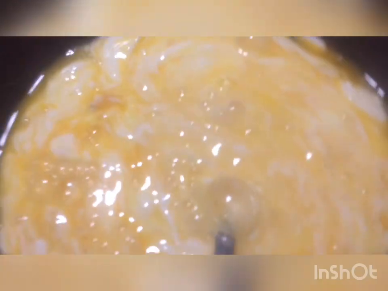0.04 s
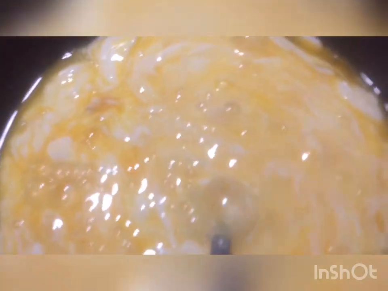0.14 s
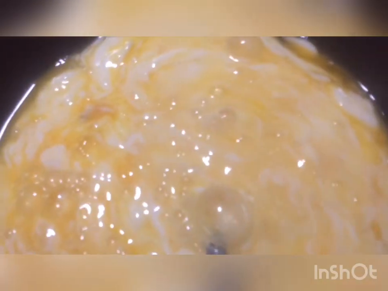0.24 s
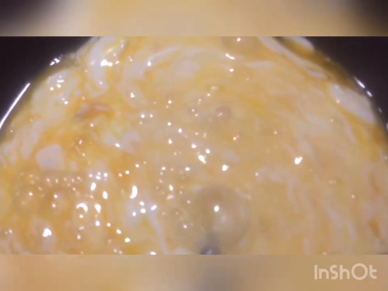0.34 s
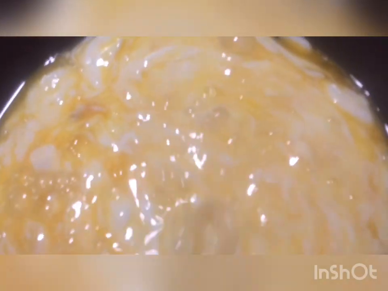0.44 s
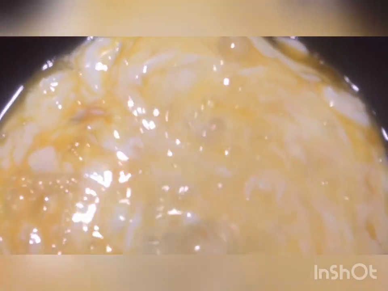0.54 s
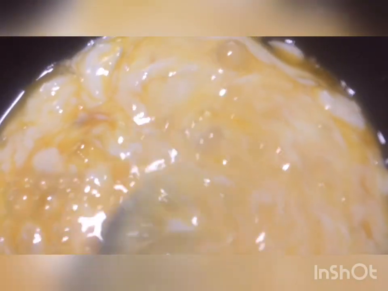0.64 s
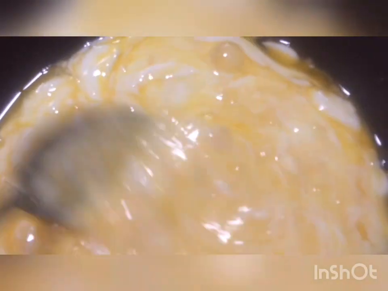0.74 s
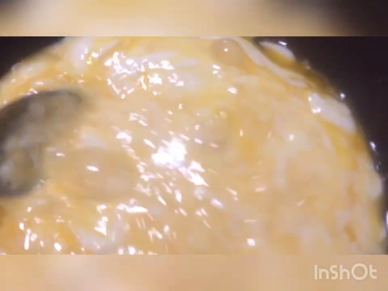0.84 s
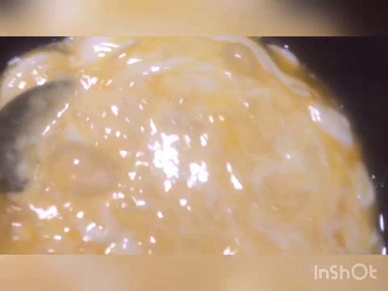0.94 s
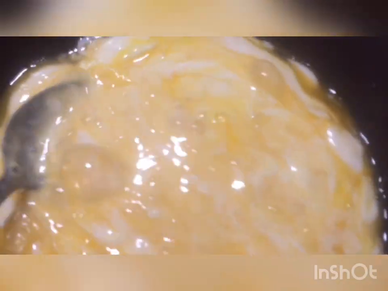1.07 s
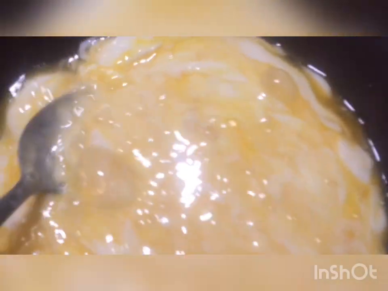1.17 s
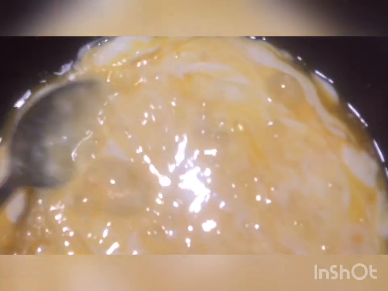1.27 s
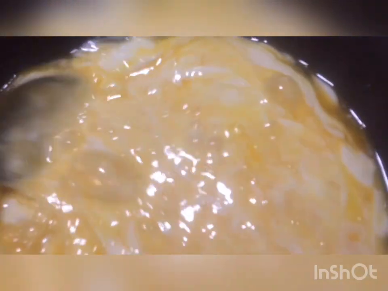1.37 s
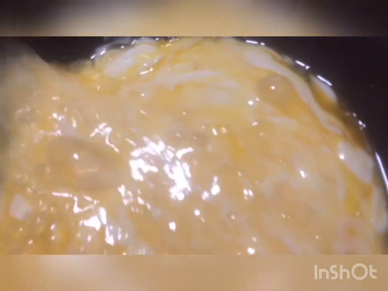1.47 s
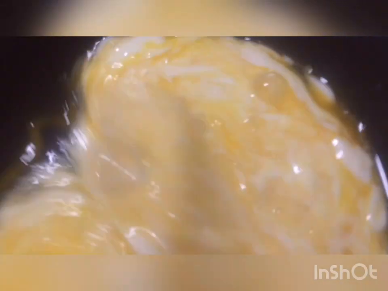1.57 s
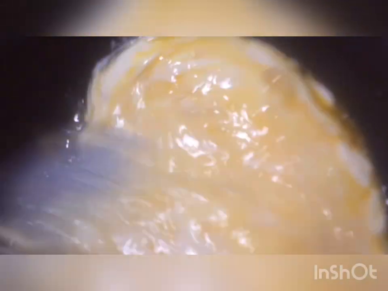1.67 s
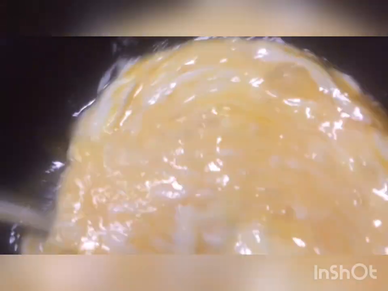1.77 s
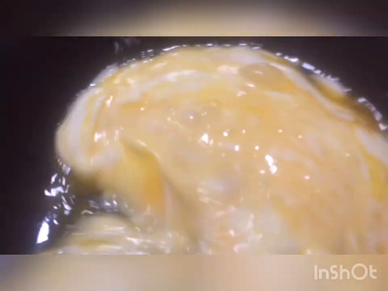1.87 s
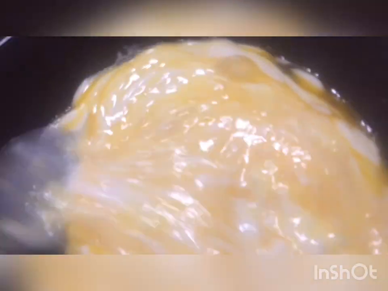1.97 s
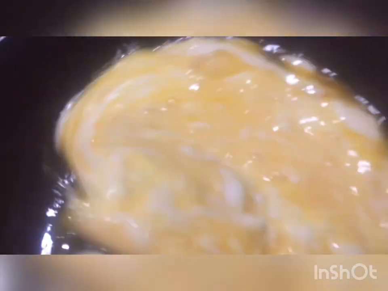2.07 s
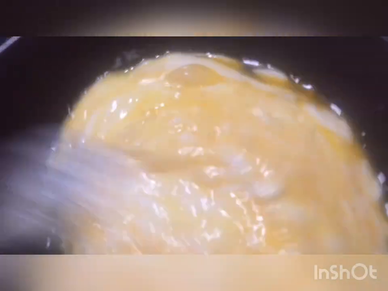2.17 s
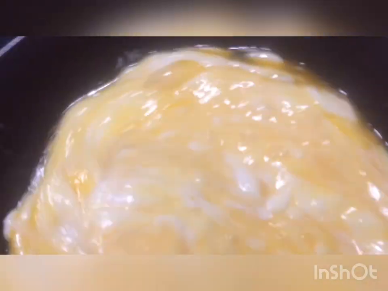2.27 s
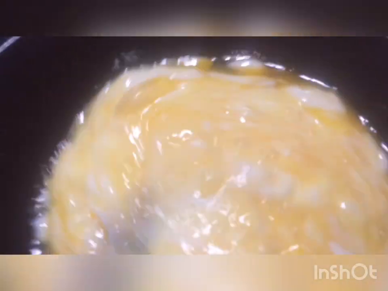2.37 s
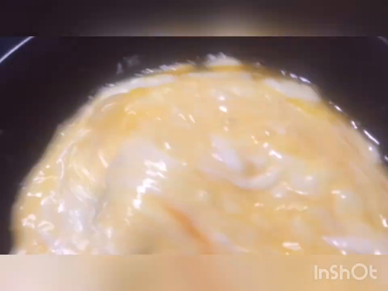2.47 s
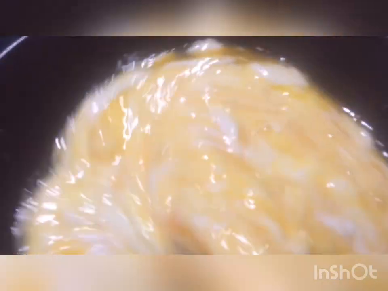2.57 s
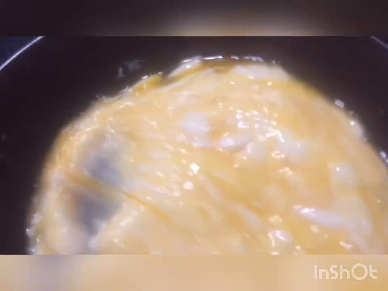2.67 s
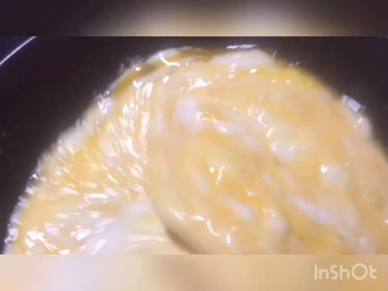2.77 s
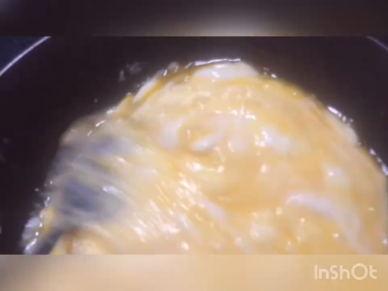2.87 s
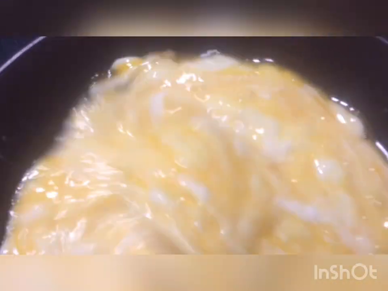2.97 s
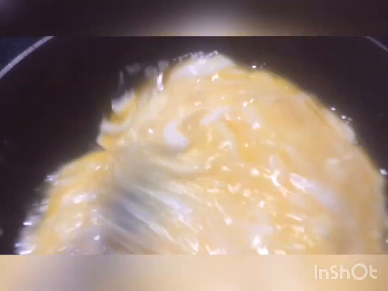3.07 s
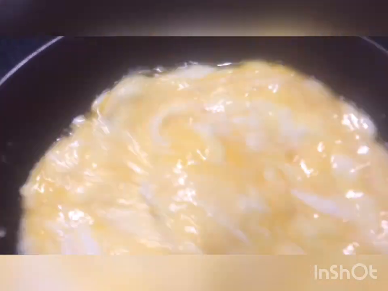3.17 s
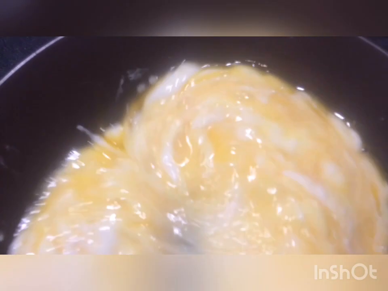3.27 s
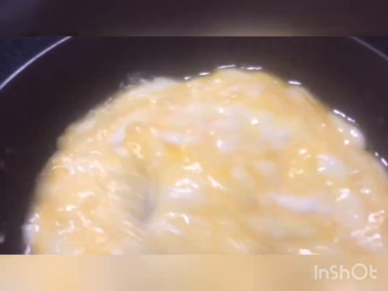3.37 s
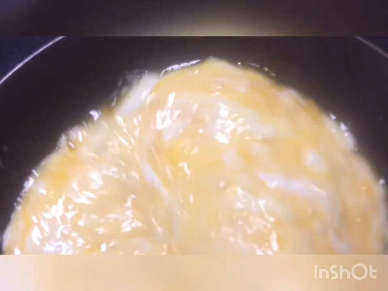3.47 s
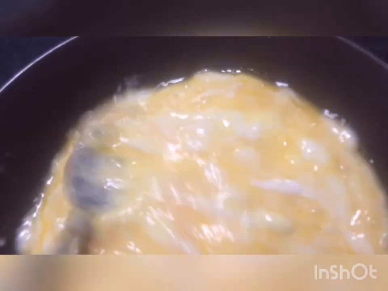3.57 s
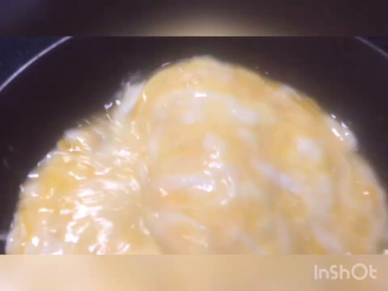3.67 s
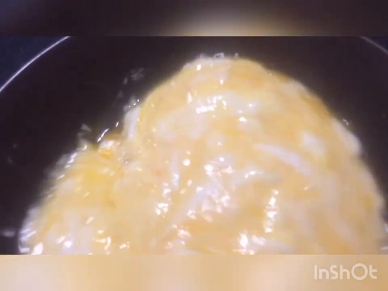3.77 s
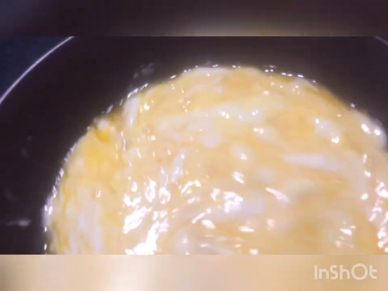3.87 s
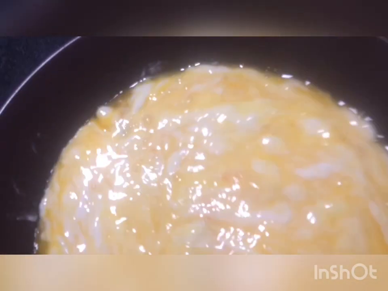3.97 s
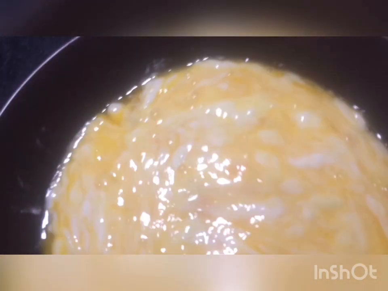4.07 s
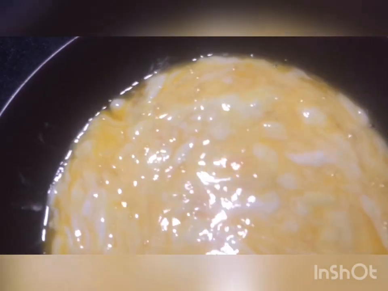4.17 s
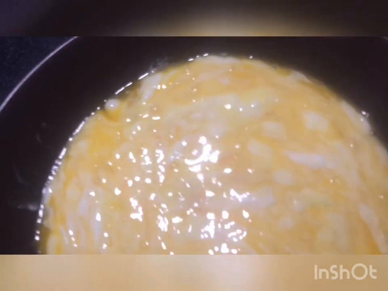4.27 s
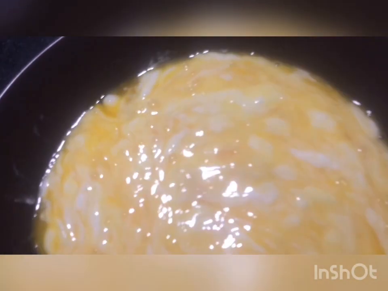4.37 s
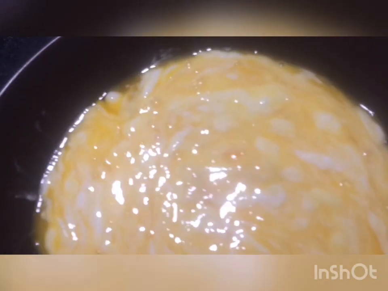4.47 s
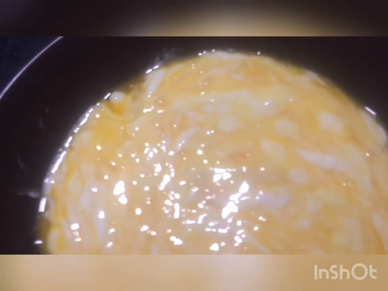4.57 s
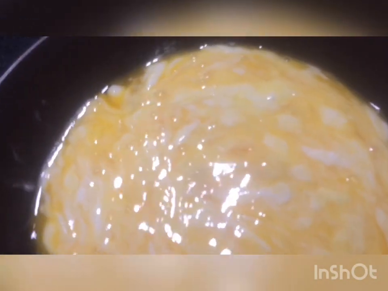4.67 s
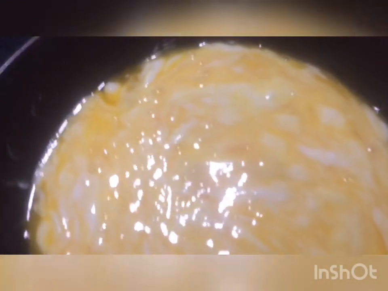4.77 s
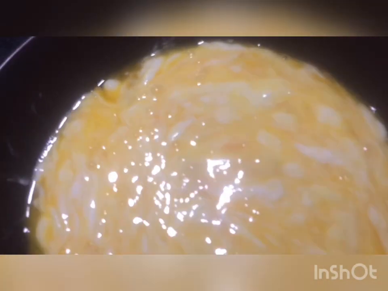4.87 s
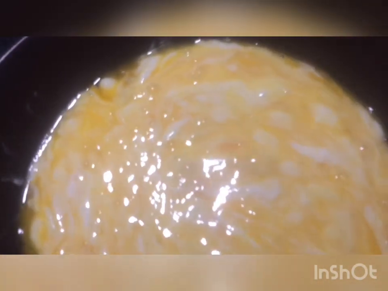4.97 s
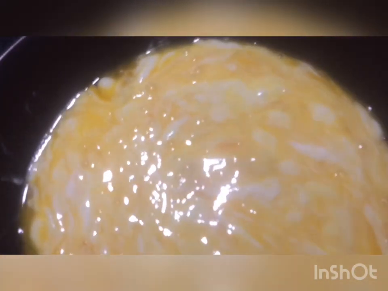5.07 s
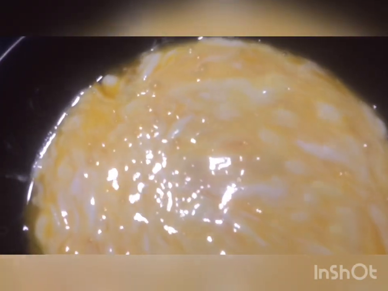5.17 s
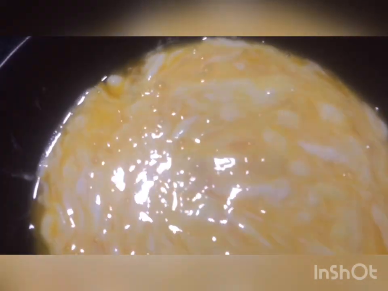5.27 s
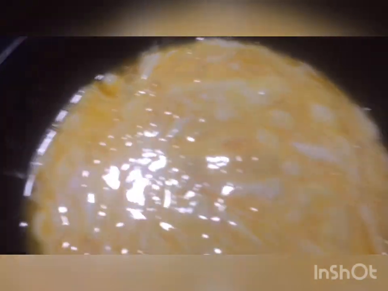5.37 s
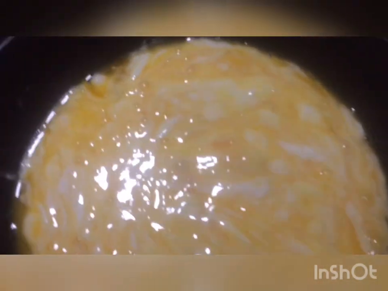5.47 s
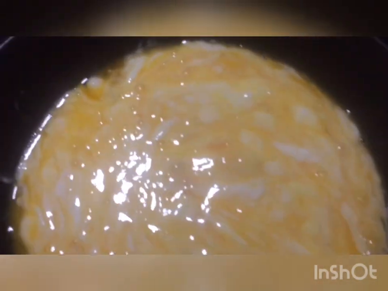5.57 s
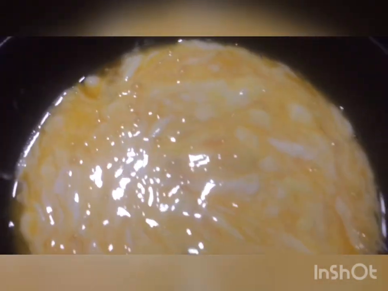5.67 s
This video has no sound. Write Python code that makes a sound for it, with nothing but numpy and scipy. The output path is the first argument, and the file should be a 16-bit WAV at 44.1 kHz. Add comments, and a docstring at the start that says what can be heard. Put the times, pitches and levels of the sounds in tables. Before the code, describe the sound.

In a small kitchen, close to the microphone, a fork makes a few slow, grinding drags across a coated metal pan, one with a brief squeak. It then beats eggs about four times a second, each stroke knocking and scraping while the egg plops and smacks. The beating eases off, the fork drops against the rim with a rattling ring, and a dull bump follows. A distant appliance whirrs faintly throughout.

```python
"""A fork beats eggs in a coated metal pan, close to the microphone, in a small kitchen.
After a few slow, grinding drags it whisks about four times a second: each stroke knocks on the pan,
skids over the bottom in stick-slip and flings egg, whose air pockets plop and whose films smack.
At the end the fork drops against the rim and rings. The near walls echo briefly, and a distant
appliance whirrs faintly behind it all."""
import sys
import numpy as np
from scipy import signal
from scipy.fft import rfft, irfft
from scipy.io import wavfile
from scipy.ndimage import uniform_filter1d, map_coordinates

SR = 44100
rng = np.random.default_rng(int(sys.argv[2]) if len(sys.argv) > 2 else 0)


def digitize_waveform(pressure):
    """Quantize a signal to 16-bit integers and store it at the path in sys.argv[1].

    Rows of a 2-D input are taken as channels; values are limited to [-1, 1].
    """
    field = np.atleast_2d(pressure).T
    bounded = np.clip(field, -1, 1)
    quanta = np.round(bounded * 32767).astype(np.int16)
    wavfile.write(sys.argv[1], SR, quanta)


N = 253134
AGE = np.arange(SR // 2) / SR   # time since an event began

# Levels are relative: the functions add their own gains.
# steady rush of the kitchen: f/Hz, level/dB
ROOM_SPECTRUM = [(15, -41), (25, -16), (161, -1.5), (185, -19), (354, -5), (416, -15.5), (624, -16.5),
                 (1040, -16), (1480, -10), (2000, -29.5), (2350, -23), (2910, -29), (4250, -20),
                 (10100, -30.5), (16000, -48.5)]
# its course: t/s, level/dB
ROOM_LEVEL = [(0, -60), (4.4, -59.5), (5.7, -61.5)]
# resonances of the distant appliance: f/Hz, width/Hz, level/dB
APPLIANCE_BANDS = [(167, 18, 0), (357.2, 30.16, -8), (643, 5.6, 0), (1322.5, 70.7, -7), (1530, 120, -5.5),
                   (1670, 35, -17)]
# its course: t/s, level/dB
APPLIANCE_LEVEL = [(0, -62), (4.399, -61.5), (4.8, -61), (5.699, -58)]
# reverberation of the kitchen: f/Hz, t60/s
KITCHEN_DECAY = [(150, 0.62), (500, .36), (1400, 0.18), (4000, 0.36), (9000, 0.25), (16000, 0.23)]

# air pockets opening in the egg: t/s, level/dB, f/Hz, level of the film bursting over them/dB
AIR_POCKETS = [(1.764, -24, 1340, -46.5), (1.7969, -18, 1220, -15.5), (2.0193, -14.5, 725, -17),
               (2.2794, -20.5, 1045, -32.5), (2.2797, -15.5, 2670, -22.5), (2.5133, -23.5, 602, -38),
               (2.578, -35, 1030, -56), (2.6972, -27, 770, -20), (2.9122, -31, 698, -22),
               (2.9374, -21, 1323, -27), (3.0197, -12.5, 1310, -23), (3.1537, -13, 1095, -15.5),
               (3.171, -21, 2980, -42), (3.187, -14, 1440, -26), (3.3467, -20, 628, -26),
               (3.421, -19, 3810, -42), (3.571, -16, 992, -16.5), (3.6391, -11, 1177, -53)]
# thick films of egg snapping off the fork: t/s, level/dB, centre f/Hz
FILM_SNAPS = [(1.814, -15, 6730), (2.0022, -23.5, 4250), (2.0776, -12.5, 6533), (2.2547, -17.5, 5130),
              (2.2805, -20, 7300), (2.4795, -16.5, 5240), (2.528, -15.5, 6334), (2.6957, -7.5, 4900),
              (2.913, -12, 5160), (2.964, -19.5, 4230), (3.2292, -25, 3300), (3.361, -16.5, 4260)]

# modes of the metal: f/Hz, level/dB, t60/s
PAN_MODES = [(175.6, -34.5, .2), (316.5, -37, 0.16), (450, -29.5, 0.046), (660, -28, 0.085),
             (830, -33, 0.29), (1274, -5.5, 0.092), (1325, -8, 0.17), (1270, -17, 0.27),
             (1406, -0.5, 0.035), (2100, 8.5, 0.015), (1957, -13.5, 0.046), (2467, -6.5, 0.06),
             (3230, -15, 0.18), (5650, -31, 0.065)]   # pan damped by egg
WALL_MODES = [(1304, -10.5, .4), (3056, -1, 0.1), (3430, -2.5, 0.13), (5020, -16, 0.13), (5152, -7, .08),
              (5915, 0, 0.11)]   # its dry wall above the egg
FORK_MODES = [(178, -26.5, 0.21), (310, -24.5, .2), (454, -26, .17), (724, -23, 0.32), (991, -15.5, .17),
              (1272, -41, 0.55), (2030, -14, 0.22), (2910, -16, 0.22), (3980, 0, 0.19), (4065, -27.5, 0.43),
              (5157, -23.5, .24), (6440, -24, .13), (6260, -29.5, 0.38), (6600, -27, .11), (8032, -21, .16),
              (10500, -22, 0.095)]   # loosely held fork
# spectra of fork meeting pan: f/Hz, level/dB
THUD_SPECTRUM = [(20, -58), (70, -36.5), (140, 0.5), (260, -11.5), (420, 0.5), (540, -2.5), (700, -2.5),
                 (1000, -6.5), (1700, -8), (3500, -38)]   # shoved pan
CRACK_SPECTRUM = [(50, -50.5), (600, -18.5), (1300, -56), (2500, 6), (4000, 8), (6000, 5), (7500, 2),
                  (10000, 0), (12500, -14.5), (16000, -24)]   # whisking hit
RIM_SPECTRUM = [(50, -49.5), (600, -18.5), (1500, -6), (2500, -6.5), (4000, 3), (5400, -12.5), (6700, 2.5),
                (7800, -6), (9000, -20), (11000, -17.5), (16000, -33)]   # hit on the rim
SKID_SPECTRUM = [(20, -36), (100, -9), (260, -30), (400, -7.5), (540, -46.5), (700, -10), (1100, -13.5),
                 (1300, -3), (1600, 0.5), (2400, -0.5), (7000, 9.5), (10500, 0), (13000, -17), (16000, -35)]   # fast slide
DRAG_SPECTRUM = [(20, -52), (100, -44), (400, -9), (560, -17.5), (850, -13), (1200, -1.5), (1750, 7),
                 (2300, 0.5), (3200, 1.5), (4400, -9), (6300, -2.5), (9000, -14.5), (12000, -29.5),
                 (16000, -39.5)]   # slow slide
# resonances of dragged tines: f/Hz, width/Hz, level/dB
GRIND_BANDS = [(1200, 120, -1.5), (1470, 120, 0), (1920, 89, -3), (2510, 110, -2), (3120, 100, -10.5),
               (5970, 66, -14)]   # grinding over the bottom
SQUEAK_BANDS = [(618, 59, -12), (890, 60, -7.5), (1155, 56, -0.5), (1673, 54, -6), (2124, 150, -16),
                (2787, 46, -1.5), (3330, 17, 5), (3940, 550, -7), (5310, 45, 3), (6530, 39, -4),
                (7450, 79, -7), (9800, 230, -15.5)]   # squeaking on the coating

# dull bumps on the pan: t/s, level/dB
SOFT_BUMPS = [(.402, -53.5), (5.139, -54), (5.7325, -18.5)]
# a tine sticks and squeals: t/s, level/dB, f/Hz, length/s
TINE_SQUEALS = [(0.444, -23, 1750, 0.04), (0.667, -35, 1450, 0.023)]
# slow drags of the fork, the last row the fork sliding on as the final skid fades: start/s, end/s, level/dB,
# treble/dB, squeak share/0-1
SLOW_DRAGS = [(0.436, 0.556, -26, 11, 0.79), (.62, .7, -40.5, -28, 0.04), (0.956, 1.171, -33.5, -21, 0),
              (1.152, 1.283, -34.5, -11.5, 0), (1.344, 1.442, -26.5, 0, 0.01), (3.795, 3.885, -46.5, -8, 0)]
# the fork strikes the pan and skids on, or bounces off (length near 0):
# t/s, force/dB, height up the wall/0-1, tine f/Hz, length/s, skid level/dB, skid treble/dB
FORK_STROKES = [(0.9589, -22.5, 0.01, 2580, 0, -60, 0), (1.6192, -14, 0.09, 1794, 0.058, -21, 0.5),
                (1.837, -16, 0.72, 3980, 0.0049, -50, 0), (1.8814, -19.5, 0.63, 3680, 0.043, -25.5, 8),
                (2.1142, -18.5, 0.5, 1910, 0.059, -24, 12), (2.3165, -14.5, 1, 3840, 0, -60, 0),
                (2.358, -21, 0.4, 1276, 0.051, -19.5, 33), (2.5855, -21, 0.1, 1242, 0.057, -23.5, -0.5),
                (2.8031, -20.5, 0.1, 1307, .065, -24, 6), (3.035, -21.5, 0.1, 1450, 0.056, -22, 2),
                (3.265, -22, 0.18, 1640, .073, -26.5, -2), (3.5004, -28, 0.12, 1340, 0.073, -29.5, -25),
                (3.7315, -27, 0.22, 1904, 0.079, -37.5, -9)]

SKID_DELAY_S = 0.0056   # the tines land, then slide


def from_db(db):
    """Decibels to amplitude."""
    return 10 ** (np.asarray(db) / 20)


def rms_one(x):
    """Scale to rms 1."""
    return x / np.sqrt(np.mean(x ** 2) + 1e-20)


def add(out, s, sound):
    """Mix a sound in at s seconds."""
    at = round(s * SR)
    out[at:at + len(sound)] += sound[:max(N - at, 0)]


def at_hz(points, hz):
    """Read a table on a log-frequency axis."""
    f, value = np.transpose(points)
    return np.interp(np.log(hz + 1), np.log(f), value)


def level_curve(points):
    """Amplitude over the whole scene from times and levels."""
    return from_db(np.interp(np.arange(N) / SR, *np.transpose(points)))


def bins(x):
    """Frequencies of a signal's spectrum."""
    return np.fft.rfftfreq(len(x), 1 / SR)


def colour(x, spectrum, treble_db=0, bass_db=0):
    """Give an excitation a spectrum and two shelves; rms 1."""
    hz = bins(x)
    shelves = treble_db * hz ** 4 / (hz ** 4 + 3300 ** 4) + bass_db / (1 + (hz / 900) ** 4)
    return rms_one(irfft(rfft(x) * from_db(at_hz(spectrum, hz) + shelves), len(x)))


def fade(t60):
    """Free decay, 60 dB in t60 seconds."""
    return from_db(-60 * AGE / max(t60, 1e-3))


def noise():
    """White noise for one event."""
    return rng.standard_normal(len(AGE))


def jitter(samples):
    """Random wavering, smoothed over so many samples; rms 1."""
    return rms_one(uniform_filter1d(noise(), size=samples))


def resonate(x, hz, width_hz):
    """One resonance of gain 1."""
    return signal.lfilter(*signal.iirpeak(hz, hz / width_hz, fs=SR), x + 1e-18)


def resonances(x, bands):
    """Several resonances side by side, signs alternating; rms 1."""
    return rms_one(sum((-1) ** k * from_db(db) * resonate(x, hz, width)
                       for k, (hz, width, db) in enumerate(bands)))


def slides():
    """The strokes that skid on after landing: start/s, end/s, level/dB, treble/dB."""
    return [(s + SKID_DELAY_S, s + length, db, treble_db)
            for s, *_, length, db, treble_db in FORK_STROKES if length > 2 * SKID_DELAY_S]


def room_tone():
    """The faint steady rush of the kitchen."""
    return level_curve(ROOM_LEVEL) * colour(rng.standard_normal(N), ROOM_SPECTRUM)


def appliance():
    """Far from the microphone, noise whirrs in narrow resonances, slightly louder towards the end."""
    air = rng.standard_normal(N)
    whirr = sum(from_db(db) * resonate(air, hz, width) for hz, width, db in APPLIANCE_BANDS)
    return level_curve(APPLIANCE_LEVEL) * rms_one(whirr)


def kitchen(direct, wet_db=-17.5, build_s=0.0034):
    """Close up, the direct sound leads; diffuse echoes of the near walls follow, the bass longest."""
    white, tail = rfft(noise()), 0
    edges = np.geomspace(60, 17000, num=17)
    for low, high in zip(edges, edges[1:]):
        band = irfft(white * ((bins(AGE) >= low) & (bins(AGE) < high)), len(AGE))
        tail = tail + band * fade(at_hz(KITCHEN_DECAY, np.sqrt(low * high)))
    tail = tail * np.minimum(AGE / build_s, 1) ** 2
    return direct + from_db(wet_db) * signal.fftconvolve(direct, tail / np.linalg.norm(tail))[:N]


def fizz(level_db=-5, size_db=5.5, cycles=35, per_stroke=14):
    """Tiny bubbles burst where the tines cut through the foam."""
    out = np.zeros(N)
    for start, end, skid_db, _ in slides():
        for when, size, pitch in rng.random((per_stroke, 3)):
            hz = 3000 * 4 ** pitch
            db = level_db + skid_db - size_db * np.log(max(size, .05))
            bubble = np.sin(2 * np.pi * hz * AGE) * fade(cycles / hz)
            add(out, start + when * (end - start), from_db(db) * bubble[:SR // 40])
    return out


def film_snap(hz, t60, edge_ratio=1.454):
    """A film of egg snaps in a broad, very short resonance; peak 1."""
    band_hz = np.clip([hz / edge_ratio, hz * edge_ratio], 20, .45 * SR)
    bandpass = signal.butter(2, band_hz, "band", fs=SR, output="sos")
    snap = signal.sosfilt(bandpass, noise() * fade(t60) + 1e-18)
    return snap / np.abs(snap).max()


def smacks(snap_db=-2, slap_db=-8, slap_delay_s=0.0033, droplets=55, scatter_s=.15):
    """A film snaps and its torn edge slaps just after; fine droplets land after the strokes."""
    out = np.zeros(N)
    for s, db, hz in FILM_SNAPS:
        add(out, s, from_db(db + snap_db) * film_snap(hz, t60=0.011))
        add(out, s + slap_delay_s, from_db(db + slap_db) * film_snap(hz, t60=0.016, edge_ratio=1.23))
    ends = [end for _, end, *_ in slides()]
    for k, (when, size, pitch) in enumerate(rng.random((droplets, 3))):
        droplet = film_snap(2200 * 4 ** pitch, t60=0.012, edge_ratio=1.2)
        add(out, ends[k % len(ends)] + scatter_s * when, from_db(-51.5 + 15 * size) * droplet)
    return out


def air_pocket(hz, cycles, hold_s=0.0068, rise=.13, swell_s=0.0008, wobble_hz=85, splat_db=-7):
    """A pocket opens with a sticky splat and rings, wobbling and rising; large ones ring longer."""
    t60 = cycles / hz + hold_s
    pitch = hz * (1 + rise * np.minimum(AGE / t60, 1)) + wobble_hz * jitter(60)
    tone = np.sin(2 * np.pi * np.cumsum(pitch) / SR) * fade(t60) * (1 - np.exp(-AGE / swell_s))
    return tone + from_db(splat_db) * film_snap(hz * 1.04, t60=.03)


def plops(pocket_db=0.5, film_db=-.5, wake_db=-26.5):
    """Air pockets burst their film; each skidding stroke opens one more in its wake."""
    out = np.zeros(N)
    for s, db, hz, snap_db in AIR_POCKETS:
        add(out, s, from_db(db + pocket_db) * air_pocket(hz, cycles=23))
        add(out, s, from_db(snap_db + film_db) * film_snap(hz=3400, t60=0.0046, edge_ratio=1.65))
    for start, *_ in slides():
        add(out, start - SKID_DELAY_S, from_db(wake_db) * air_pocket(hz=748.4, cycles=46))
    return out


def burst(spectrum, t60):
    """Many crowded modes struck at once; rms 1 over the first hundredth of a second."""
    x = colour(noise(), spectrum) * fade(t60)
    return x / np.sqrt(np.mean(x[:SR // 100] ** 2))


def ring(modes, spread_db=1.5):
    """One blow on metal: each mode gets a strength and sign of its own."""
    out = 0
    for hz, db, t60 in modes:
        strength = from_db(db + spread_db * rng.standard_normal()) * rng.choice([-1, 1])
        out = out + strength * np.sin(2 * np.pi * hz * AGE) * fade(t60)
    return out


def bumps(pan_db=-5, fork_db=-14):
    """Soft contacts raise a thud and a little ring of pan and fork, but no crack."""
    out = np.zeros(N)
    for s, db in SOFT_BUMPS:
        ringing = from_db(pan_db) * ring(PAN_MODES) + from_db(fork_db) * ring(FORK_MODES)
        add(out, s, from_db(db) * (burst(THUD_SPECTRUM, t60=0.12) + ringing))
    return out


def dropped_fork(s=4.1608, ring_db=-9.5, thud_db=-28, crack_db=-15, bounce_s=.0337, loss_db=3):
    """Out of the egg and loosely held, the fork bounces and rings on, rattling against the rim."""
    out = np.zeros(N)
    for k in range(3):
        rattle = 1 + .3 * jitter(200)
        ringing = from_db(ring_db) * ring(FORK_MODES) * rattle
        thud = from_db(thud_db) * burst(THUD_SPECTRUM, t60=0.28)
        crack = from_db(crack_db) * burst(RIM_SPECTRUM, t60=.04)
        add(out, s, from_db(-loss_db * k) * (ringing + thud + crack))
        s += bounce_s * .825 ** k   # each bounce comes sooner
    return out


def slips(per_s, size_db):
    """Stick-slip on a grainy coating: random clicks of uneven size."""
    chance, size, sign = rng.random((3, len(AGE)))
    strength = from_db(-size_db * np.log(np.maximum(size, .02)))
    return (chance < per_s / SR) * strength * np.sign(sign - .5)


def tines(grit, gain, t60):
    """The tines ring briefly in crowded modes that change with every grip."""
    tail = noise() * fade(t60)
    return grit + gain * signal.fftconvolve(grit, tail / np.linalg.norm(tail))[:len(grit)]


def glide(x, length, rise, wander):
    """As the contact slides unevenly along the tines, all their resonances move together."""
    speed = 1 + rise * (np.minimum(AGE / length, 1) - 2 / 3) + wander * jitter(900)
    return map_coordinates(x, [np.cumsum(speed)], order=3, mode="mirror")


def pressure(length, rise_s, swell_db, release_s):
    """The fork bears down, slides with growing or easing force and lifts off."""
    landing = np.minimum(AGE / rise_s, 1) ** 2
    force = from_db(swell_db * np.clip(2 * AGE / length - 1, -.5, .5))
    lift = np.exp(-np.maximum(AGE - length, 0) / release_s)
    return landing * force * lift


def squeals():
    """Stick-slip locks briefly onto one mode of a tine."""
    out = np.zeros(N)
    for s, db, hz, length in TINE_SQUEALS:
        swell = np.sin(np.pi * np.minimum(AGE / length, 1)) ** 2
        add(out, s, from_db(db) * np.sin(2 * np.pi * hz * AGE) * swell)
    return out


def drags(judder_db=1, bass_db=-4.5, squeak_bass_db=20, body_db=-4):
    """Slow strokes grind dully and unevenly through a few resonances; squeaking tines shake the pan."""
    out = np.zeros(N)
    for start, end, db, treble_db, squeak_share in SLOW_DRAGS:
        judder = from_db(judder_db * jitter(300))
        grit = slips(per_s=5500, size_db=2.5) * judder
        shake_db = bass_db + squeak_bass_db * squeak_share
        grind = colour(tines(grit, gain=0.73, t60=0.058), DRAG_SPECTRUM, treble_db, shake_db)
        grind = rms_one(grind + from_db(body_db) * resonances(grit, GRIND_BANDS))
        grind = glide(grind, end - start, rise=.04, wander=.008)
        squeak = resonances(grit, SQUEAK_BANDS)
        scrape = rms_one(np.sqrt(1 - squeak_share) * grind + np.sqrt(squeak_share) * squeak)
        bearing = pressure(end - start, rise_s=0.039, swell_db=-4.5, release_s=0.0031)
        add(out, start, from_db(db) * scrape * bearing)
    return out


def skids(tilt_db=-9.5, squelch_db=-7):
    """Fast strokes rasp brightly over the bottom, bearing down harder, with a rising squelch."""
    out = np.zeros(N)
    for start, end, db, treble_db in slides():
        grit = slips(per_s=10000, size_db=4.5)
        rasp = colour(tines(grit, gain=5.5, t60=0.013), SKID_SPECTRUM, treble_db + tilt_db)
        rasp = glide(rasp, end - start, rise=rng.uniform(-.02, .14), wander=.015)
        squelch = rms_one(resonate(grit, hz=1950, width_hz=110))
        squelch = glide(squelch, end - start, rise=.22, wander=.015)
        scrape = rms_one(rasp + from_db(squelch_db) * squelch)
        bearing = pressure(end - start, rise_s=.0012, swell_db=3.5, release_s=.0045)
        add(out, start, from_db(db) * scrape * bearing)
    return out


def knocks(pan_db=-1.5, wall_db=-9, fork_db=-12.5, tine_db=5.5, spike_db=-2.5, crack_db=-5, firm_db=-20):
    """Each hit of the fork is a spike of contact, a crack, a thud and a short ring of pan and tines."""
    out = np.zeros(N)
    for s, force_db, height, tine_hz, *_ in FORK_STROKES:
        pan = from_db(pan_db) * ring(PAN_MODES)
        wall = from_db(wall_db) * ring(WALL_MODES, spread_db=2.5)
        fork = from_db(fork_db) * ring(FORK_MODES, spread_db=2) * fade(t60=0.48)   # the hand damps it
        tine = from_db(tine_db) * np.sin(2 * np.pi * tine_hz * AGE) * fade(t60=0.036)
        spike = from_db(spike_db) * burst(CRACK_SPECTRUM, t60=0.014)
        crack = from_db(crack_db) * burst(CRACK_SPECTRUM, t60=0.054)
        add(out, s, from_db(force_db) * (spike + crack + wall + fork))
        # a hit on the bottom rings the pan most, one high on the wall least
        ring_db = force_db + 9 - 33.5 * height
        add(out, s, from_db(ring_db) * (pan + tine))
        # the thud grows faster than the force, and a high hit shoves the pan more
        thud_db = -43 + 2 * (force_db - firm_db) + 5 * height
        add(out, s, from_db(thud_db) * burst(THUD_SPECTRUM, t60=0.22))
    return out


def scene(radiation_hz=110):
    """Fork, pan and egg close to one microphone in the kitchen; things so small radiate little bass."""
    metal = knocks() + skids() + drags() + squeals() + bumps() + dropped_fork()
    egg = plops() + smacks() + fizz()
    near = signal.sosfilt(signal.butter(2, radiation_hz, "high", fs=SR, output="sos"), metal + egg)
    return (kitchen(near) + room_tone() + appliance())[None]


def record(dry):
    """After the microphone, the highest peaks are rounded and the top treble is cut."""
    ceiling, cutoff_hz = 1.2, 16800
    rounded = ceiling * np.tanh(dry / ceiling)
    return signal.sosfilt(signal.cheby2(14, 60, cutoff_hz, fs=SR, output="sos"), rounded)


dry = scene()
out = record(dry)
digitize_waveform(out)
```